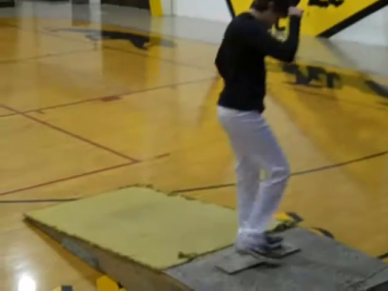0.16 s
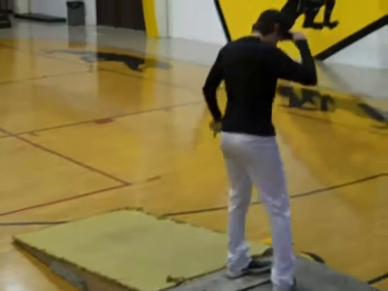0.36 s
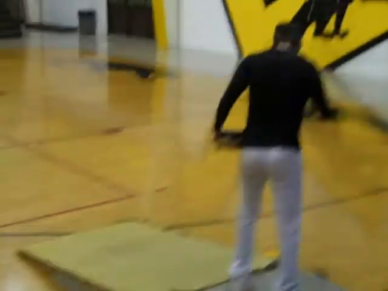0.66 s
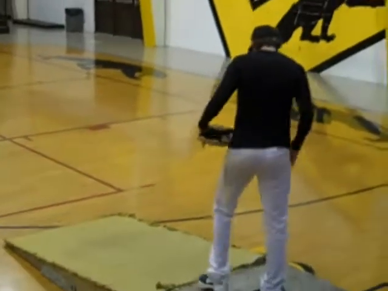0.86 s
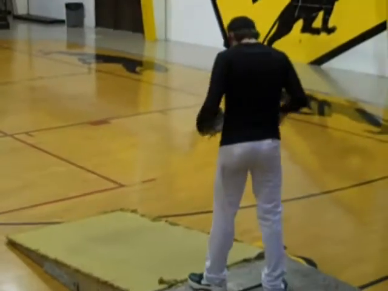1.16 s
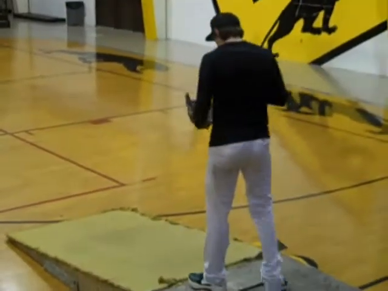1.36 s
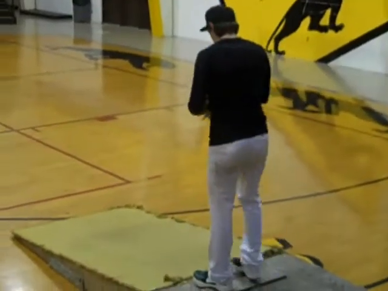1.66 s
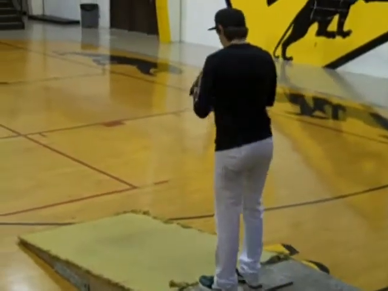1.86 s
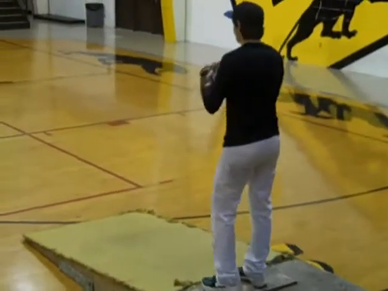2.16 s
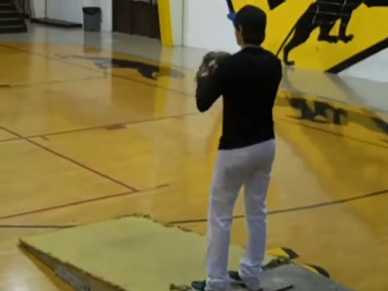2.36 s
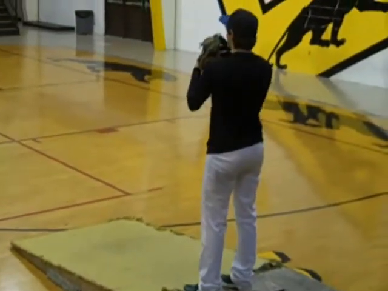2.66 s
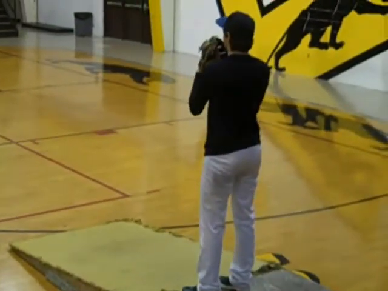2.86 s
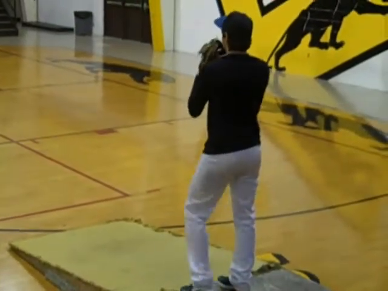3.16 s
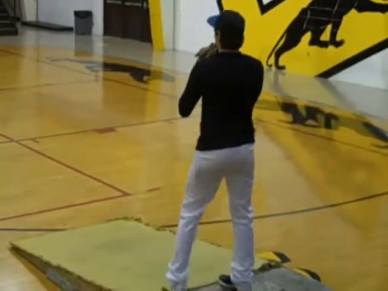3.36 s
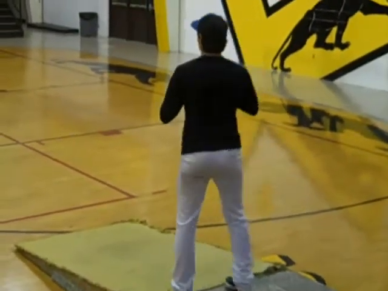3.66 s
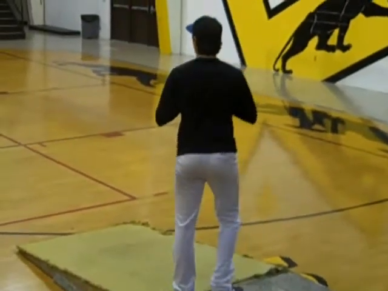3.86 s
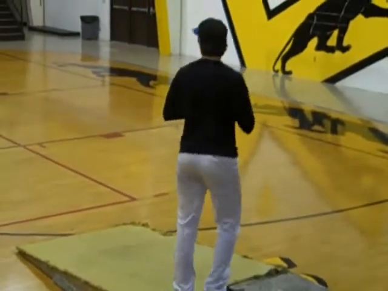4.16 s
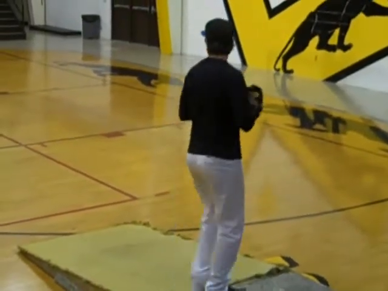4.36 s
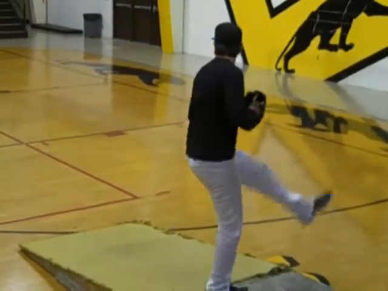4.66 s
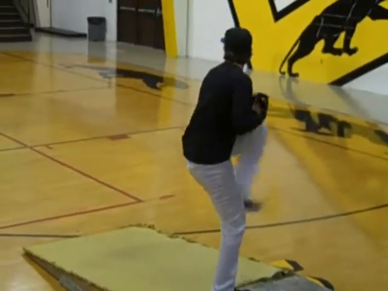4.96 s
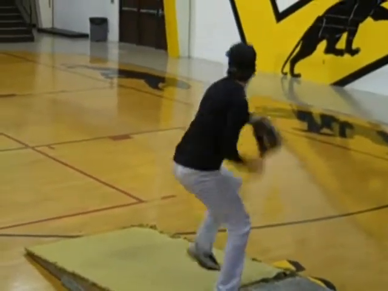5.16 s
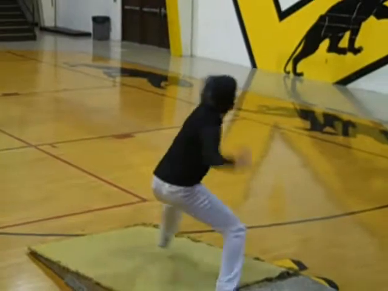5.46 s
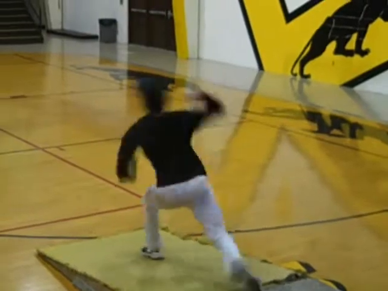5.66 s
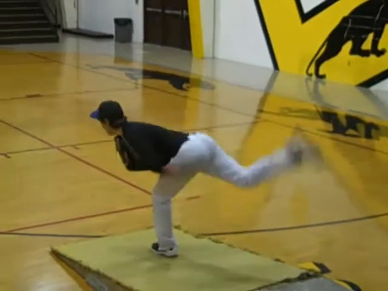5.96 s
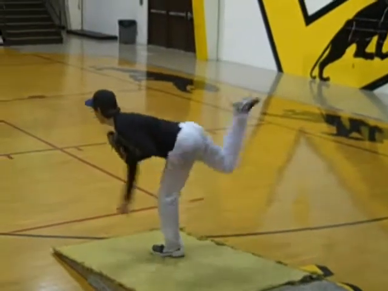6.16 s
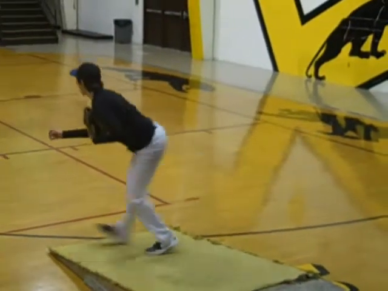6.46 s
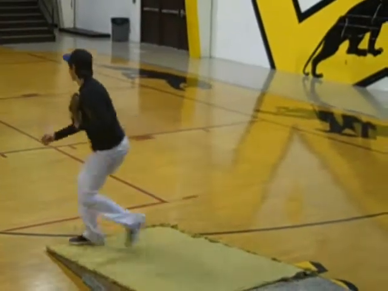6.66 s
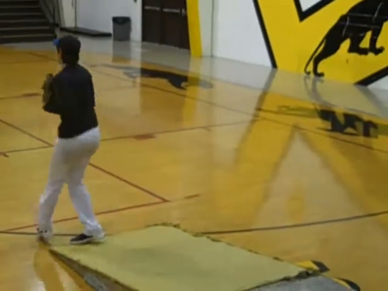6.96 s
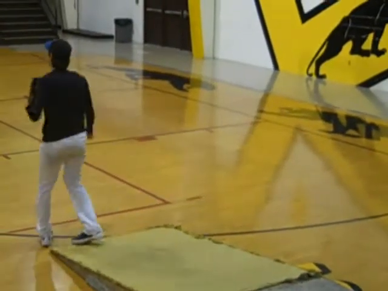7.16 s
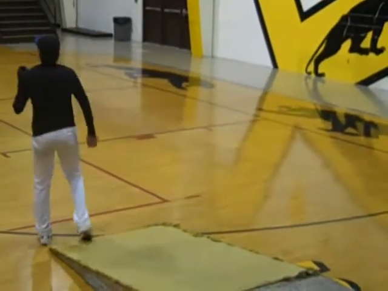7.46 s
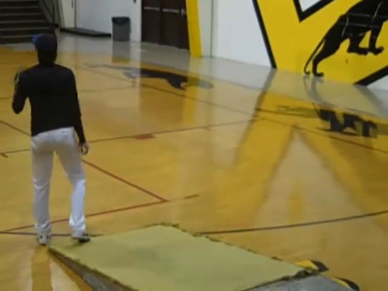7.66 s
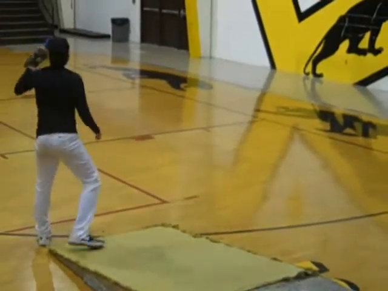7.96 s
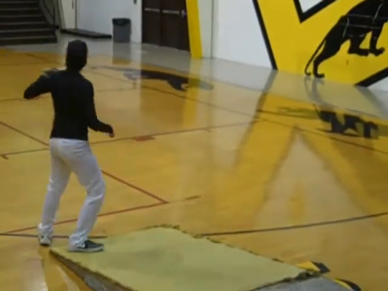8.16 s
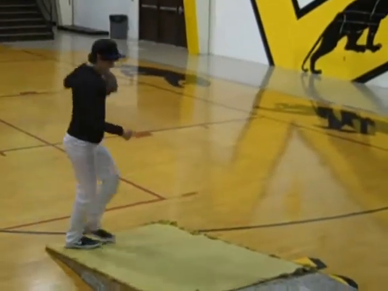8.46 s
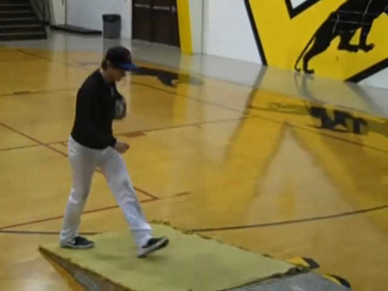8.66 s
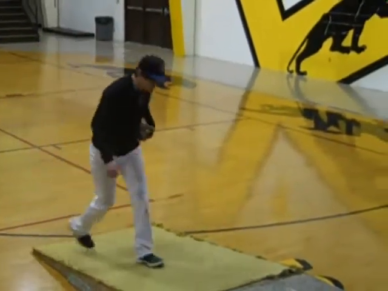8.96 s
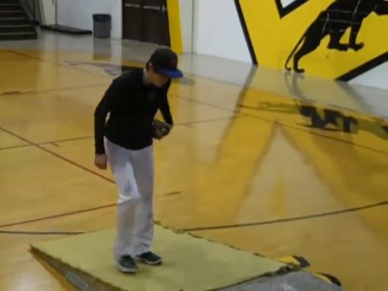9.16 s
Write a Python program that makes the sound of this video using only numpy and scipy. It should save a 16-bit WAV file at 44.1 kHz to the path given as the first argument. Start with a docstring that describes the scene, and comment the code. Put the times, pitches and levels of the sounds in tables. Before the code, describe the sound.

A baseball pitch pops loudly into a catcher's mitt in an echoing gymnasium, with thumping footsteps and a steady electrical whine.

```python
"""A loud pop of a pitch in the far catcher's mitt rings through a gymnasium.
Before it the pitcher shuffles and strides on a hollow wooden mound: booms, knocks, scuffs, light ticks.
The return throw smacks into the pitcher's own glove. Each catch is a leather slap, a crack and the
ring of the air pocket. An electrical hum with a high whine, ventilation rumble and hiss run throughout."""
import sys
import numpy as np
from scipy import signal
from scipy.fft import rfft, irfft, next_fast_len
from scipy.io import wavfile
from scipy.ndimage import map_coordinates

SR = 44100
rng = np.random.default_rng(int(sys.argv[2]) if len(sys.argv) > 2 else 0)


def master(y):
    """Save y as 16-bit WAV."""
    cut = np.clip(np.atleast_2d(y).T, -1, 1)
    pcm = np.round(cut * 32767)  # scale
    wavfile.write(sys.argv[1], SR, pcm.astype(np.int16))


N = 410571
TIME = np.arange(N) / SR

# balance of the two microphone ports for impacts and rumble: f/Hz, left minus right/dB
PORT_BALANCE = [(50, -8.5), (150, 1), (2800, 0), (4400, -2), (6300, -11), (7300, 13.5), (8400, 17.5),
                (12000, 7)]
# same for hiss and weak hum lines: f/Hz, left minus right/dB
HISS_BALANCE = [(3000, -1), (4500, -3), (6200, -10), (7200, -13), (8500, 13), (10500, 2.5), (14000, 2)]


def from_db(db):
    """Decibels to gain."""
    return 10 ** (np.asarray(db) / 20)


def at_hz(points, hz):
    """Table lookup on a log-frequency axis."""
    f, value = np.transpose(points)
    return np.interp(np.log(np.maximum(hz, 1)), np.log(f), value)


def drift(rate_hz):
    """Smooth random curve, spread near 1."""
    knots = rng.standard_normal(400)
    return map_coordinates(knots, [TIME[::100] * rate_hz], order=3, mode="wrap").repeat(100)[:N]


def convolve(x, impulse):
    """Mono or stereo convolution, cut to N samples."""
    return signal.oaconvolve(np.atleast_2d(x), np.atleast_2d(impulse), axes=1)[:, :N]


def response(spectrum, size=4096):
    """Unit-energy minimum-phase response from rows of f/Hz, level/dB."""
    hz = np.fft.rfftfreq(size, 1 / SR)
    cepstrum = irfft(np.log(from_db(at_hz(spectrum, hz))))
    cepstrum[1:size // 2] *= 2
    cepstrum[size // 2 + 1:] = 0
    impulse = irfft(np.exp(rfft(cepstrum)))
    return impulse / np.linalg.norm(impulse)


def ringing(modes):
    """Unit-energy response of a body with damped modes."""
    t = TIME[:SR // 2]
    ring = sum((-1) ** k * from_db(db - 60 * t / t60_s) * np.sin(2 * np.pi * hz * t)
               for k, (hz, db, t60_s) in enumerate(modes))
    return ring / np.linalg.norm(ring)


def contact(start_s, db, length_s, size=16384):
    """Burst of tiny collisions that swells and dies."""
    age = TIME[:size] / length_s
    envelope = 2 * age * np.exp(1 - 2 * age)
    burst = envelope * rng.standard_normal(size)
    for _ in range(4):  # flatten the spectrum, restore the decay
        burst = irfft(np.exp(1j * np.angle(rfft(burst)))) * envelope ** 0.25
    burst *= from_db(db) * np.linalg.norm(envelope) / np.linalg.norm(burst)
    return np.pad(burst, (round(start_s * SR), N))[:N]


def stereo_noise(size):
    """White noise at two close ports: alike in the bass, apart in the treble."""
    # coherence of the ports: f/Hz, correlation/1
    coherence = [(100, .98), (500, .96), (1100, .76), (2500, .62), (5000, .45), (8000, .3), (13000, .1)]
    mid, side = rfft(rng.standard_normal((2, next_fast_len(size, True) * 2)))
    alike = at_hz(coherence, np.linspace(0, SR / 2, len(mid)))
    return irfft(np.sqrt((1 + alike) / 2) * mid + np.sqrt((1 - alike) / 2) * side * [[1], [-1]])[:, :size]


def ports(x, balance, taps=257):
    """Each port favours different bands."""
    hz = np.linspace(0, SR / 2, taps)
    pair = [signal.firwin2(taps, hz, from_db(side * at_hz(balance, hz) / 2), fs=SR) for side in (1, -1)]
    return signal.oaconvolve(x * np.ones((2, 1)), pair, "same", axes=1)


def catcher_mitt(touch_s=6.4493):
    """The pitch slaps the leather, cracks home and scatters off the walls behind the catcher."""
    # leather slap spectrum: f/Hz, level/dB
    slap_spectrum = [(35, -37), (60, -25), (149, -8), (201, -12), (247, -1.5), (317, 1), (457, -8.5),
                     (658, 0), (772, -8), (1160, -18.5), (2210, -14.5), (3330, -23), (6300, -21),
                     (8100, -31.5), (14000, -59)]
    # crack spectrum: f/Hz, level/dB
    crack_spectrum = [(500, -33), (1300, -29), (1800, 3), (2300, 11), (3000, 3.5), (4500, -17), (6500, -12),
                      (9000, -17), (14000, -25)]
    # air pocket modes: f/Hz, level/dB, t60/s
    pocket_modes = [(310, -19, .03), (530, 0.5, 0.012), (708, -5.5, 0.03)]
    # wall returns: delay/s, slap before trim/dB, pocket gain/dB, spread/s
    wall_returns = [(0.0123, -8.5, -4, 0.0068), (.0235, -1.5, 0.5, 0.0084)]
    leather = response(slap_spectrum)
    slap = convolve(contact(touch_s, db=-2.5, length_s=0.0055), leather)
    crack = convolve(contact(6.4513, db=1.5, length_s=0.0021), response(crack_spectrum))
    hollow = air_pocket(pocket_modes, start_s=6.4532, peak_db=1)
    echoes = 0
    for delay_s, slap_db, pocket_db, spread_s in wall_returns:
        echoes += convolve(contact(touch_s + delay_s, slap_db - 1, spread_s), leather)
        echoes += from_db(pocket_db) * np.roll(hollow, round(delay_s * SR))
    hall = gym_reverb(slap, wet_db=5.5, build_s=0.011, t60_scale=1.08, far_wall_db=1.5, far_wall_s=0.26)
    return slap + crack + hollow + echoes + hall


def pitcher_glove():
    """The return throw brushes the webbing, then smacks into the pocket close by."""
    # glove leather spectrum: f/Hz, level/dB
    leather_spectrum = [(35, -70), (60, -40), (109, -22.5), (241, -13), (325, -9.5), (447, -1), (549, -8),
                        (846, -1.5), (1110, -14), (2160, -10.5), (2650, -15), (3110, -10.5), (6900, -16),
                        (9940, -33), (14000, -52)]
    # webbing crack spectrum: f/Hz, level/dB
    webbing_spectrum = [(1500, -23), (4000, -8), (6000, 12), (8500, 2), (13000, -20)]
    # air pocket modes: f/Hz, level/dB, t60/s
    pocket_modes = [(433, -6.5, 0.029), (690, -2, 0.017), (842, -1, 0.025)]
    leather = response(leather_spectrum)
    brush = convolve(contact(8.2796, db=-18.5, length_s=0.002), leather)
    smack = convolve(contact(8.2819, db=-10.5, length_s=0.00398), leather)
    crack = convolve(contact(8.2818, db=-15, length_s=0.0038), response(webbing_spectrum))
    hollow = air_pocket(pocket_modes, start_s=8.2848, peak_db=-10)
    hall = gym_reverb(smack + hollow, wet_db=4.5, build_s=0.0083, t60_scale=0.96,
                      far_wall_db=2.5, far_wall_s=0.069)
    return brush + smack + crack + hollow + hall


def air_pocket(modes, start_s, peak_db):
    """The ball drives the air out of the pocket in one push."""
    push = np.zeros(N)
    push[round(start_s * SR)] = from_db(peak_db)
    ring = ringing(modes)
    return convolve(push, ring / np.abs(ring).max())


def footwork():
    """Steps, scuffs and ticks; thuds build up in the hall more slowly than bright sounds."""
    thuds, knocks = footfalls()
    bright = knocks + scuffs() + ticks()
    low_hall = gym_reverb(thuds, wet_db=-2, build_s=0.028, t60_scale=0.94)
    bright_hall = gym_reverb(bright, wet_db=0.5, build_s=0.0017, t60_scale=0.81)
    return thuds + bright + low_hall + bright_hall


def footfalls():
    """Each rolling foot booms in the hollow mound, thumps its boards and knocks on the deck."""
    # steps: t/s, weight/dB, boom re weight/dB, knock re weight/dB
    steps = [(.002, -33, -9, -1), (.25, -44, -11, -2), (.494, -29.5, -12, -20), (1.178, -36.5, -4, -2.5),
             (1.955, -41, -14, -7.5), (2.492, -42, -2, -3.5), (3.68, -46, -1, -11), (4.02, -40, -12, -6),
             (4.255, -39, -6, -16.5), (5.779, -22, -1, -14), (5.882, -18, -2.5, 0.5),
             (6.753, -16, -13, -15), (7.353, -28, -6, 1), (7.62, -39, -2, -13), (8.385, -33, -1, -1),
             (8.966, -43.5, -10, 5)]
    # heel, sole, toe: delay/s, load gain/dB, knock gain/dB, contact length/s
    foot_roll = [(0, 0, 0, .017), (0.031, -4, -10, 0.022), (.135, -10, -16.5, 0.024)]
    # whole-mound modes: f/Hz, level/dB, t60/s
    mound_modes = [(42, -11, .15), (67, 0, 0.19), (88.5, -7, 0.14)]
    # single-board modes: f/Hz, level/dB, t60/s
    board_modes = [(125, 2, 0.11), (160.5, -3.5, 0.11), (187.5, -2.5, 0.11), (266, -7, 0.087),
                   (336, -12, 0.093)]
    # deck knock spectrum: f/Hz, level/dB
    deck_spectrum = [(100, -15.5), (300, -0.5), (500, 2), (750, -0.5), (1100, -11), (1650, -12),
                     (2300, -17.5), (4000, -27), (9000, -38), (14000, -54)]
    booms = thumps = knocks = 0
    for start_s, weight_db, boom_db, knock_db in steps:
        for delay_s, load_db, hard_db, length_s in foot_roll:
            push = contact(start_s + delay_s, weight_db, length_s, size=4096)
            booms += from_db(load_db + boom_db) * push
            thumps += from_db(load_db) * push
            knocks += from_db(hard_db + knock_db) * push
    thuds = convolve(booms, ringing(mound_modes)) + convolve(thumps, ringing(board_modes))
    return thuds, convolve(knocks, response(deck_spectrum))


def scuffs():
    """Soles rub over the mound, each rub with its own brightness."""
    # rubs: t/s, level/dB, length/s, centre/Hz
    rubs = [(.002, -49, 0.097, 4540), (0.577, -41.5, 0.014, 4800), (.584, -45, .012, 900),
            (1.3, -56, 0.17, 3500), (4.552, -49, 0.032, 2610), (5.721, -46.5, 0.065, 900),
            (5.797, -42.5, 0.05, 5000), (5.892, -42.5, .094, 6340), (7.348, -41, 0.024, 4750),
            (9.14, -44, 0.0062, 5800)]
    # rub spectrum: f/centre, level/dB
    rub_spectrum = [(.2, -12), (.55, -3.5), (1, -2), (1.4, -6), (2.6, -22), (6, -33)]
    out = 0
    for start_s, db, length_s, centre_hz in rubs:
        spectrum = [(centre_hz * ratio, band_db) for ratio, band_db in rub_spectrum]
        out += convolve(contact(start_s, db, length_s), response(spectrum))
    return out


def ticks(trim_db=-8, length_s=0.0035):
    """Light woody contacts that all ring alike."""
    # contacts: t/s, level before trim/dB
    taps = [(0.3452, -30), (4.0751, -32), (4.5493, -39), (5.0569, -33.5), (5.6775, -31.5)]
    # wood modes: f/Hz, level/dB, t60/s
    wood_modes = [(1480, -1, 0.0095), (2330, -0.5, 0.011), (2870, -2.5, 0.0061), (3950, -3.5, .007)]
    pushes = sum(contact(start_s, db + trim_db, length_s) for start_s, db in taps)
    return convolve(pushes, ringing(wood_modes))


def gym_reverb(x, wet_db, build_s, t60_scale, far_wall_db=0, far_wall_s=0.2, size=110250):
    """Diffuse tail: builds, swells with the far wall's return, dies treble first."""
    # hall decay before scaling: f/Hz, t60/s
    decay = [(60, 1.8), (150, 2.5), (330, 2.5), (700, 2.0), (1200, 1.95), (2400, 2), (4500, 1.59),
             (8000, 1.12), (13000, 1.5)]
    # diffuse spectrum: f/Hz, level/dB
    spectrum = [(60, -0.5), (200, -2.5), (600, -0.46), (1200, -0.085), (2500, 0.74), (5000, -1.1),
                (8000, -0.5), (13000, -5.5)]
    hz, frame_s, bands = signal.stft(stereo_noise(size), SR, nperseg=512)
    fade_db = at_hz(spectrum, hz)[:, None] - 60 * frame_s / (t60_scale * at_hz(decay, hz)[:, None])
    tail = signal.istft(bands * from_db(fade_db), SR)[1][:, :size]
    t = TIME[:size]
    swell = from_db(far_wall_db * np.exp(-((t - far_wall_s) / 0.076) ** 2))
    build = 1 - np.exp(-t / build_s)
    return from_db(wet_db) * convolve(x, tail * swell * build / np.sqrt(SR / 7))


def electrical_hum(mains_hz=59.9948, whine_hz=6719.42, whine_gain_db=5, port_lag_s=3.8e-5,
                   waver_db=0.85, settle_s=0.45, start_dip_db=5, unsteady_rad=1.9):
    """Even mains harmonics, the loudest a whine; the high ones waver, most of all at the start."""
    # low lines, equal in both ports: f/Hz, rms level/dB
    low_lines = [(240, -59), (360, -65), (480, -65), (600, -63), (720, -64), (840, -66), (1080, -62),
                 (1200, -68), (1440, -65), (2040, -61.5), (2280, -69), (3360, -67.5), (3960, -69),
                 (4080, -68)]
    # lines round the whine: f/Hz, left/dB, right/dB
    cluster = [(4690, -83, -58), (5400, -62, -54.5), (5540, -55.5, -63), (5640, -78, -56.5),
               (5767, -55.5, -46), (5970, -66, -47), (6120, -56, -61), (6240, -60, -47), (6370, -56, -49.5),
               (6600, -60, -51), (6854, -51, -53.5), (6960, -59, -69), (8020, -54.5, -64), (8280, -60, -68),
               (8640, -62, -70)]
    # whine: t/s, level before gain/dB, left minus right/dB
    whine_track = [(0.0, -49, -5.0), (0.54, -48.5, -9), (0.95, -48, 1), (1.74, -49, -9.5), (3.09, -50, -6),
                   (4.91, -47, -7), (6.3, -50, -8)]
    unsettled = np.clip((settle_s - TIME) * 6, 0, 1)
    lines = []
    for hz, left_db, right_db in [(hz, db, db) for hz, db in low_lines] + list(cluster):
        change_db = waver_db * drift(1.31) - start_dip_db * unsettled * hz / whine_hz
        lines.append((hz, np.array([[left_db], [right_db]]) + change_db))
    knots_s, *columns = np.transpose(whine_track)
    whine_db, pan_db = [np.interp(TIME, knots_s, column) for column in columns]
    lines.append((whine_hz, whine_gain_db + whine_db + pan_db * np.array([[0.5], [-0.5]])))
    lines.append((4920, -58 - 15 * (1 - unsettled)))  # recedes as the whine settles
    harmonics = [round(hz / mains_hz) for hz, _ in lines]
    lag_s = np.array([[port_lag_s], [0]])
    out = np.zeros((2, N))
    for k, (_, db) in zip(harmonics, lines):
        turns = k * mains_hz * (TIME - lag_s) + rng.random()
        jitter_rad = unsteady_rad * unsettled * drift(8.6) * k * mains_hz / whine_hz
        out += np.sqrt(2) * from_db(db) * np.sin(2 * np.pi * turns + jitter_rad)
    return out + hum_bed(mains_hz, harmonics, lag_s)


def hum_bed(mains_hz, strong_harmonics, lag_s, odd_db=-13, scatter_db=3):
    """Weak, uneven mains harmonics between the strong ones; odd ones fainter still."""
    # line envelope: f/Hz, base level per line/dB
    envelope = [(120, -65), (1000, -66), (1800, -76.5), (3000, -80), (4200, -71), (5200, -68),
                (6500, -70.5), (7300, -68.5), (8400, -72.5), (9300, -81), (11000, -100)]
    k = np.setdiff1d(np.arange(2, 185), strong_harmonics)
    hz = k * mains_hz
    turns = rng.random(len(k)) - hz * lag_s
    line_db = at_hz(envelope, hz) + odd_db * (k % 2) + scatter_db * rng.standard_normal(len(k))
    spectrum = np.zeros((2, N // 2 + 1), complex)
    spectrum[:, np.round(hz * N / SR).astype(int)] = from_db(line_db) * np.exp(2j * np.pi * turns)
    return ports(irfft(spectrum, N) * N / np.sqrt(2), HISS_BALANCE)


def ventilation(gain_db=-52):
    """Low rumble of moving air."""
    # rumble spectrum: f/Hz, level/dB
    spectrum = [(15, -32), (25, -7.5), (65, 1), (186, -7), (242, 2), (265, -8.5), (484, -11.5),
                (565, -15.5), (592, -10), (1000, -23), (1300, -26), (2200, -120)]
    return from_db(gain_db) * ports(convolve(stereo_noise(N), response(spectrum)), PORT_BALANCE)


def hiss(gain_db=-52.4):
    """Smooth noise, mostly independent in the two ports."""
    # hiss spectrum: f/Hz, level/dB
    spectrum = [(600, -2), (1200, -0.5), (2400, 1.5), (3400, -2), (5000, -0.5), (6600, 5.5), (7400, 1),
                (8300, 2), (9300, -9), (10300, -13.5), (14000, -13.5)]
    white = rng.standard_normal((2, N)) + 0.27 * rng.standard_normal(N)
    noise = convolve(white, response(spectrum))
    return from_db(gain_db) * ports(noise / np.sqrt(np.mean(noise ** 2)), HISS_BALANCE)


def scene():
    """Catches and footwork over the steady sounds of the hall."""
    blows = catcher_mitt() + pitcher_glove() + footwork()
    blows = blows / (1 + blows ** 4) ** 0.25  # peaks overload the capsules
    return ports(blows, PORT_BALANCE) + electrical_hum() + ventilation() + hiss()


def record(dry, limit_db=-8, attack_s=0.0018, release_db_per_s=25, cutoff_hz=14200):
    """A limiter ducks after the loudest pop and recovers; peaks clip, the top is cut."""
    pole = np.exp(-1 / (attack_s * SR))
    power = signal.lfilter([1 - pole], [1, -pole], np.mean(dry ** 2, axis=0))
    excess_db = np.maximum(10 * np.log10(power + 1e-12) - limit_db, 0)
    release_db = release_db_per_s * TIME
    duck_db = np.maximum.accumulate(excess_db + release_db) - release_db
    limited = np.clip(dry * from_db(-duck_db), -1, 1)
    lowpass = signal.ellip(12, 0.1, 80, cutoff_hz, fs=SR, output="sos")
    return np.clip(signal.sosfilt(lowpass, limited), -1, 1)


dry = scene()
out = record(dry)
master(out)
```